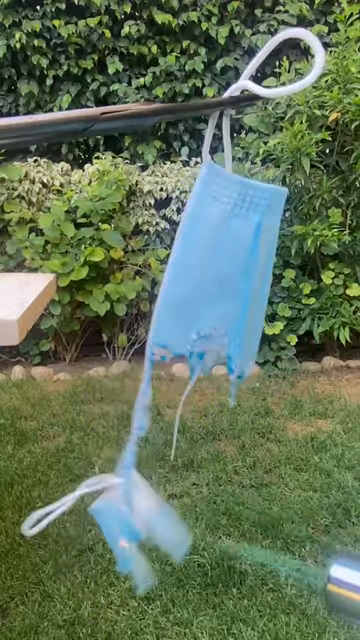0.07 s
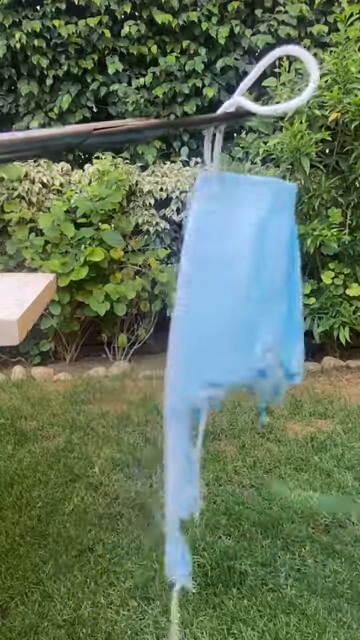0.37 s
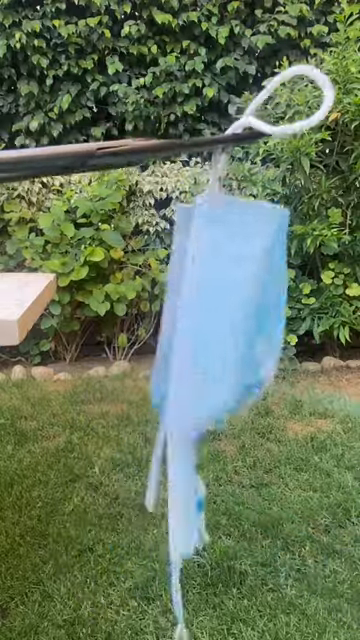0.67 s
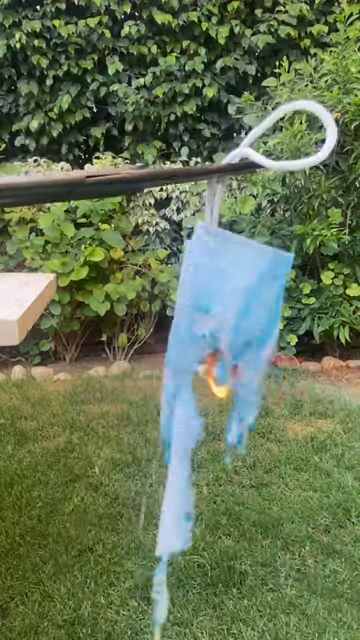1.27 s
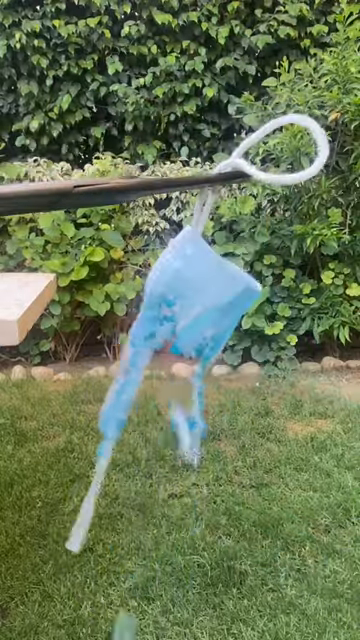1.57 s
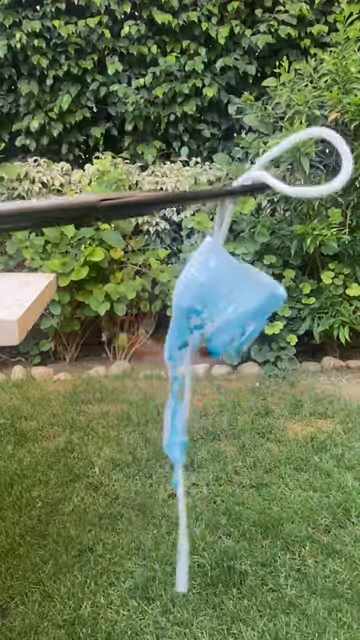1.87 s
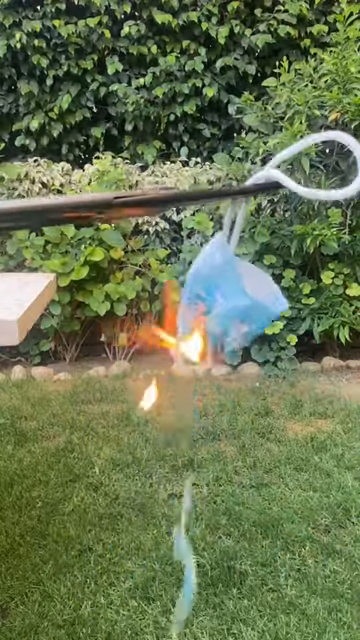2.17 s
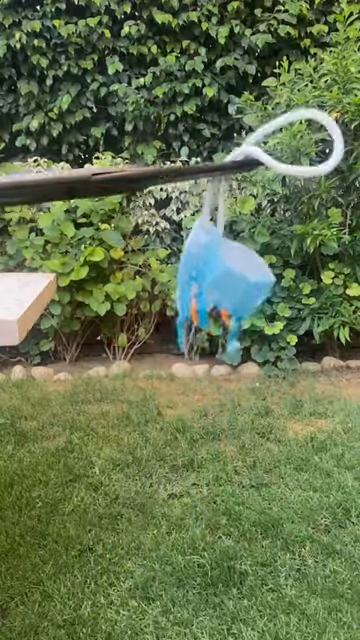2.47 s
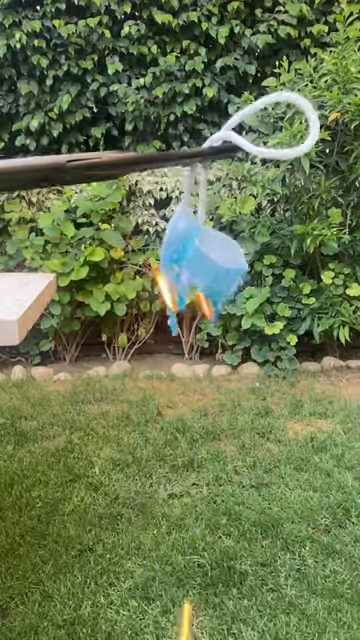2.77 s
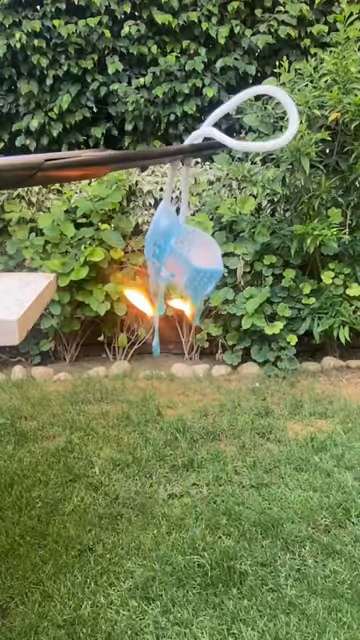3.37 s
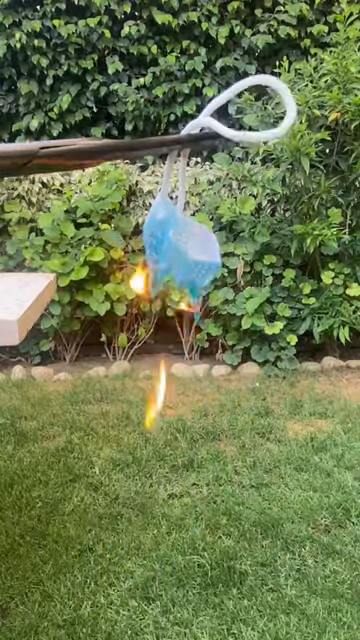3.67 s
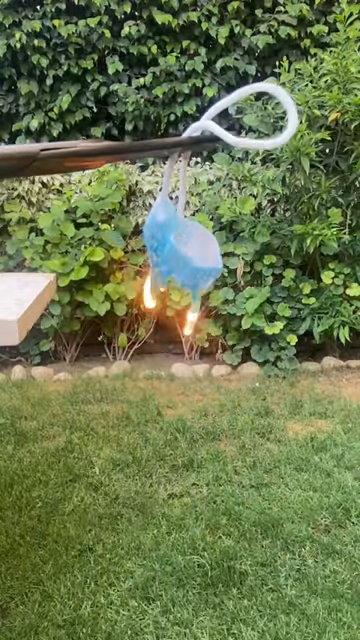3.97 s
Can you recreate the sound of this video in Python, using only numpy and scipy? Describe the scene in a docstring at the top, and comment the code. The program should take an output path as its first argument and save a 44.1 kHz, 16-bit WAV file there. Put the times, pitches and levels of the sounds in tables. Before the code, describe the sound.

A gas torch burns close by with a steady, fluttering roar and a bright, ringing hiss. From about 2.3 seconds, melting plastic sizzles, spits and pops while the hiss swells. The torch cuts off abruptly at about 3.2 seconds, leaving a quiet outdoor rumble. A faint puff and tick come at 3.5 seconds, then a soft low buffet of air and one more spit near 3.9 seconds.

```python
"""A hand-held gas torch burns a hanging piece of plastic in a garden, close to two microphones.
The flame roars, and the gas jet hisses and rings in the burner tube. The hiss swells as the torch is
turned away; then the gas is shut off, and a small puff follows a moment later. The burning plastic
sizzles, spits and pops as bubbles burst and gas escapes. A quiet outdoor rumble lies under it all."""
import sys
import numpy as np
from scipy import signal
from scipy.fft import rfft, irfft
from scipy.io import wavfile

SR = 44100
rng = np.random.default_rng(int(sys.argv[2]) if len(sys.argv) > 2 else 0)


def int16_out(signal):
    """Quantize to a 16-bit WAV file."""
    q = np.round(np.clip(np.atleast_2d(signal).T, -1, 1) * 32767)
    wavfile.write(sys.argv[1], SR, q.astype(np.int16))


N = 176400
T = np.arange(N) / SR
HZ = np.maximum(np.fft.rfftfreq(N, 1 / SR), 1)
TUBE_LIKENESS = 0.96   # how alike the torch's ringing is at the two microphones, 0-1

# the flame in stereo: (frequency [Hz], likeness [0-1], left lead [rad], left over right [dB])
FLAME_STEREO = [(50, .99, -.05, 1.2), (130, .997, -.27, .9), (250, .997, -.37, .7), (550, .99, -.65, -.3),
                (690, .55, -1.7, -3), (790, .9, -.8, -5), (950, .8, -2.2, -4.5), (1100, .45, -4.2, -6),
                (1400, .85, -5.6, -5), (1750, .85, -6.6, -4), (2200, .4, -8, -2)]
# the garden in stereo: same columns
GARDEN_STEREO = [(100, .985, -.12, 1.2), (400, .85, -.2, 0), (1000, .4, -1.4, 0), (3000, .35, -2.8, 0),
                 (6000, .35, -3, 0), (10000, .1, -1.5, 0)]


def from_db(db):
    """Turn decibels into a gain to multiply by."""
    return 10 ** (np.asarray(db) / 20)


def in_time(rows):
    """A gain that follows points of (time [s], level [dB])."""
    return from_db(np.interp(T, *np.transpose(rows)))


def over_hz(rows):
    """Join a table's points into curves over frequency, one for each column after the first."""
    hz, *columns = np.transpose(rows)
    return [np.interp(np.log(HZ), np.log(hz), column) for column in columns]


def flutter(depth_db, rate_hz):
    """A gain that wavers at random."""
    slow = irfft(rfft(rng.standard_normal(N)) / (1 + (HZ / rate_hz) ** 2), N)
    gain = from_db(depth_db * slow / slow.std())
    return gain / np.sqrt(np.mean(gain ** 2))


def fade(start_s, db_per_s):
    """Full level, then a steady fall."""
    return from_db(-db_per_s * np.maximum(T - start_s, 0))


def hump(hz, half_width):
    """The shape of a resonance: a gain that favours frequencies near hz."""
    return 1 / (1 + ((HZ - hz) / half_width) ** 2)


def low_pass(x, edge_hz):
    """Cut the treble steeply."""
    return signal.sosfilt(signal.butter(8, edge_hz, fs=SR, output="sos"), x)


def noise(colour, likeness, lead, pan_db=0):
    """Stereo noise: likeness is the share both sides have in common, lead the left's head start [rad]."""
    shared, left, right = rfft(rng.standard_normal((3, N)))
    common, own = np.sqrt(likeness), np.sqrt(1 - likeness)
    left = (common * shared * np.exp(1j * lead) + own * left) * from_db(pan_db)
    right = common * shared + own * right
    x = irfft(np.array([left, right]) * colour, N)
    return x / np.sqrt(np.mean(x ** 2))


def turbulence(colour, stereo):
    """The noise of swirling air, shaped by a tone colour table and a stereo table."""
    return noise(from_db(over_hz(colour)[0]), *over_hz(stereo))


def flame_roar():
    """Burning gas makes a fluttering roar that dies when the valve closes."""
    # tone of the roar: (frequency [Hz], relative level [dB])
    colour = [(30, -21.5), (60, -23.5), (90, -12.5), (130, -4), (200, 2), (280, -0.5), (360, -6), (480, -7),
              (590, -11), (685, -25), (775, -9), (850, -16.5), (970, -22.5), (1200, -23), (1480, -24),
              (1780, -27.5), (1950, -35.5), (2250, -39), (3000, -86.5)]
    # strength of the flame: (time [s], level [dB])
    strength = [(0, -39.5), (.7, -39.5), (1.4, -39.5), (2.3, -40), (2.7, -41.5), (3.15, -42)]
    roar = turbulence(colour, FLAME_STEREO) * in_time(strength)
    return roar * flutter(depth_db=1.31, rate_hz=38) * fade(start_s=3.185, db_per_s=413.5)


def jet_rush():
    """Gas rushes out of the nozzle with a bright hiss."""
    # tone of the rush: (frequency [Hz], relative level [dB])
    colour = [(2050, -30), (2350, -1.5), (2600, 5.5), (3400, 1), (3800, 0.5), (4200, -1), (4700, 1),
              (5300, 7), (5800, -4), (6100, 2), (6600, -3.5), (7150, -4.5), (7700, -12), (8150, -16.5),
              (8450, -28), (9000, -32), (9600, -53), (12000, -66)]
    # the rush in stereo: (frequency [Hz], likeness [0-1], left lead [rad], left over right [dB])
    stereo = [(2300, .6, 2.6, -1), (3000, .95, 3.05, 0), (3500, .95, 3.1, 0), (3850, .9, 2.9, 0),
              (4050, .5, 1.5, -1), (4200, .55, 0, -2), (4500, .88, -2.7, 0), (5300, .82, -3, -1),
              (6000, .45, -3.1, -2), (6600, .4, -3.4, -4), (6900, .8, -3.14, 0), (7150, .99, -3.14, 0),
              (7400, 1, -3.14, 0)]
    # strength of the rush: (time [s], level [dB])
    strength = [(0, -65), (.28, -63), (.42, -58.5), (1.3, -56.5), (1.7, -59), (2.3, -58), (2.6, -58.5),
                (3.15, -64)]
    return turbulence(colour, stereo) * in_time(strength)


def resonances(rows):
    """Swirling gas rings at several pitches, each sputtering on its own."""
    dull_top = 1 / (1 + (HZ / 6760) ** 16)
    out = 0
    for hz, half_width, db, lead in rows:
        rasp = flutter(depth_db=1.8, rate_hz=80)
        out += from_db(db) * rasp * noise(dull_top * hump(hz, half_width), TUBE_LIKENESS, lead)
    return out


def burner_ring():
    """The burner tube rings; its mouth is heard too at first, while the nozzle is close."""
    # resonances of the tube: (pitch [Hz], half width [Hz], level [dB], left lead [rad])
    tube_tones = [(2721, 52, -60, 0.46), (2970, 31, -68, -1.5), (3100, 45, -71, 3.5),
                  (4180, 45, -77.5, -1.3), (5222, 30, -67, 1), (5596, 34, -69, 1.3)]
    # their strength as the torch moves: (time [s], gain [dB])
    tube_strength = [(0, -8), (.27, -8), (.42, -1.5), (1.2, -1), (1.8, -2), (2.33, -1.5), (2.46, -13.5),
                     (3.15, -18)]
    # resonances of the mouth: (pitch [Hz], half width [Hz], level [dB], left lead [rad])
    mouth_tones = [(2655, 41, -59, 3), (2765, 134, -57, 1.5), (3103, 65, -67, 0.2), (3670, 630, -66.5, -3),
                   (5174, 38, -68.5, 0.6), (6580, 220, -67.5, 3.5)]
    tube = resonances(tube_tones) * in_time(tube_strength)
    return tube + resonances(mouth_tones) * fade(start_s=0.32, db_per_s=113.5)


def sliding_rings():
    """Two resonances slide in pitch and level as the aim of the torch changes."""
    # paths of the lower and the higher resonance: (time [s], pitch [Hz], level [dB])
    low_path = [(0, 3100, -60.5), (.3, 3130, -62.5), (.6, 3230, -65.5), (2.3, 3180, -64),
                (2.5, 3180, -67.5), (2.8, 3163, -66), (3.15, 3130, -73.5)]
    high_path = [(0, 5170, -74), (.3, 5155, -69), (.6, 5110, -68.5), (1.3, 5100, -65.5), (1.9, 4990, -68.5),
                 (2.3, 5060, -61.5), (2.75, 5275, -64), (3.0, 5280, -56), (3.15, 5210, -60)]
    out = 0
    for path, half_width_hz in (low_path, 40), (high_path, 120):
        times, hz, db = np.transpose(path)
        steady = signal.hilbert(noise(hump(hz.mean(), half_width_hz), TUBE_LIKENESS, lead=3.25))
        offset_hz = np.interp(T, times, hz) - hz.mean()
        slide = np.exp(2j * np.pi * np.cumsum(offset_hz) / SR)   # moves the pitch by offset_hz
        out += from_db(np.interp(T, times, db)) * (steady * slide).real
    return out


def tube_whistle():
    """The burner tube gives a very faint, high whistle from its overtones."""
    # whistle tones: (pitch [Hz], half width [Hz], level [dB])
    tones = [(11810, 55, -111), (12200, 60, -112)]
    return sum(from_db(db) * noise(hump(hz, width), TUBE_LIKENESS, lead=0) for hz, width, db in tones)


def garden():
    """Distant rumble and outdoor air, with a faint fluttering in the middle range."""
    # tones of the rumble and the fluttering: (frequency [Hz], relative level [dB])
    rumble_colour = [(25, -29.5), (60, -13.5), (100, 2), (145, 3.5), (200, -4.5), (300, -10), (480, -27.5),
                     (780, -19.5), (980, -40), (1250, -36.5), (1480, -25.5), (1800, -38), (2300, -47.5),
                     (3200, -41), (4000, -45.5), (5400, -42.5), (7500, -65), (11000, -71), (16000, -62)]
    stir_colour = [(250, -21.5), (450, 0), (560, 1), (680, -7.5), (790, 3.5), (1000, -20), (1480, -9),
                   (2200, -31.5), (5000, -52.5)]
    # strength of the rumble: (time [s], level [dB])
    strength = [(3.27, -52), (3.4, -55), (3.5, -53), (3.7, -54.5), (3.85, -53)]
    stir = from_db(-73) * flutter(depth_db=1.7, rate_hz=14) * turbulence(stir_colour, GARDEN_STEREO)
    return in_time(strength) * turbulence(rumble_colour, GARDEN_STEREO) + stir


def turned_hiss():
    """A broad hiss swells as the nozzle is turned away."""
    # tone of the hiss: (frequency [Hz], relative level [dB])
    colour = [(900, -25), (1250, -16.5), (1700, -21), (2030, -18.5), (2320, -29.5), (2560, -2), (2800, 10),
              (2950, -2), (3050, -5.5), (3150, -5), (3400, -26.5), (4200, -33), (4800, -6), (5230, 0),
              (5500, -9), (5730, -5.5), (6200, -23.5), (6800, -35.5), (9000, -68)]
    # the hiss in stereo: (frequency [Hz], likeness [0-1], left lead [rad], left over right [dB])
    stereo = [(1250, .8, 2.8, -2), (2000, .93, 3.1, 0), (2500, .995, 3.12, 0), (3150, 1, 3.14, 0),
              (4800, .82, 3.2, 0), (5300, .83, 3.05, 0), (6200, .8, 3.1, 0)]
    # its swell: (time [s], level [dB])
    swell = [(1.8, -87.5), (2.35, -62), (2.5, -56), (2.75, -55.5), (2.98, -49.5), (3.15, -52.5)]
    return turbulence(colour, stereo) * in_time(swell)


def melt_noise(hz, octaves, lead):
    """Gas leaving the melted plastic: a broad band of noise with a dull top."""
    band = (1 + (np.log2(HZ / hz) / octaves) ** 2) ** -1.5
    dull_top = 1 / np.sqrt(1 + (HZ / 7000) ** 16)
    return noise(band * dull_top, likeness=0.92, lead=lead)


def sizzle():
    """Tiny bubbles of melt burst at random while the flame is on the plastic."""
    start_s, end_s, bursts_per_s, decay_s = 2.25, 3.15, 30, 0.0012
    level_db, spread_db = -59.5, 1.5
    bursts = (rng.random(N) < bursts_per_s / SR) & (T > start_s) & (T < end_s)
    sizes = bursts * from_db(level_db + spread_db * rng.standard_normal(N))
    envelope = signal.lfilter([1], [1, -np.exp(-1 / (decay_s * SR))], sizes + 1e-18)   # each dies away
    return low_pass(envelope * melt_noise(hz=1350, octaves=0.7, lead=3.4), edge_hz=4800)


def spits():
    """Each spit is a short, grainy burst of escaping gas with a faint echo from the hedge."""
    # gas bursts: (time [s], level [dB], hold [s], centre [Hz], width [octaves], left lead [rad])
    bursts = [(2.313, -39.5, 0.0038, 6250, 1, 2.48), (2.314, -42, 0.0019, 1470, 0.92, 3.2),
              (2.358, -46.5, 0.0042, 5200, .4, 2.5), (2.372, -52, 0.0017, 1700, 0.86, 2.3),
              (2.551, -51.5, 0.0068, 5230, 0.29, 1.1), (2.731, -50.5, 0.0035, 1300, .5, 3),
              (2.758, -42, 0.0091, 1490, 0.33, 2.75), (2.758, -44, 0.0038, 5070, 0.3, 2.6),
              (2.783, -45.5, 0.0066, 1370, 0.38, 2.9), (2.937, -56.5, 0.0057, 1190, 0.65, 0.81),
              (2.939, -54, 0.011, 5000, 0.58, 1.5), (2.948, -54, 0.004, 1490, 0.5, .8),
              (3.531, -70, 0.004, 4330, 0.57, 1.5), (3.605, -73, 0.028, 1600, 0.6, 3.9),
              (3.839, -70, 0.0059, 735, 0.88, 1.1), (3.855, -64, 0.018, 560, 1.1, 1),
              (3.906, -64, 0.0098, 620, 0.44, 0.54), (3.9353, -49, 0.018, 5300, 0.34, 1.1),
              (3.939, -61, 0.02, 2770, 1.5, 0.46), (3.952, -64, 0.043, 5100, 0.35, 1.7),
              (3.971, -61, 0.0071, 4000, 0.6, 1.1)]
    attack_s, decay_s, tail_s, tail_db = 0.0009, 0.0012, 0.03, -23
    grain = flutter(depth_db=3.5, rate_hz=270)
    out = 0
    for start, db, hold, hz, octaves, lead in bursts:
        rise = np.clip((T - start) / attack_s, 0, 1)
        after_hold = np.maximum(T - start - hold, 0)
        fall = np.exp(-after_hold / decay_s) + from_db(tail_db) * np.exp(-after_hold / tail_s)
        out += from_db(db) * rise * fall * melt_noise(hz, octaves, lead)
    return low_pass(out * grain, edge_hz=7800)


def pops():
    """A blister bursts in one sharp pulse, followed by faint scatter from the leaves."""
    # bursting blisters: (time [s], peak [dB], low edge [Hz], high edge [Hz], left lead [rad])
    blisters = [(2.3136, -28.5, 3300, 7800, 2.7), (2.3985, -29.5, 3200, 5300, .7),
                (2.76, -39, 1100, 5200, 1.5), (3.5332, -49, 1800, 6200, .7), (3.9495, -40, 2500, 6200, .8)]
    tail_db, tail_s = -31, 0.012
    out = 0
    for start, db, low, high, lead in blisters:
        tail = (T > start) * np.exp(-np.minimum(np.abs(T - start) / tail_s, 20))
        pulse = from_db(tail_db) * tail * rng.standard_normal(N)
        pulse[int(start * SR)] = 1
        band = signal.butter(2, [low, high], "band", fs=SR, output="sos")
        pop = signal.hilbert(low_pass(signal.sosfilt(band, pulse), high))   # lets the left side lead
        out += from_db(db) * np.real([pop * np.exp(1j * lead), pop]) / np.abs(pop).max()
    return out


def far_chirp():
    """One faint chirp sounds far away."""
    # the chirp: (time [s], half length [s], pitch [Hz], half width [Hz], level [dB])
    chirp = (3.345, .04, 3330, 170, -80)
    time, half_length, hz, half_width, db = chirp
    envelope = from_db(db) * np.exp(-((T - time) / half_length) ** 2)
    return envelope * noise(hump(hz, half_width), likeness=1, lead=np.pi / 2)


def soft_puff():
    """One small, soft puff sounds a moment after the flame has gone out."""
    # the puff: (time [s], half length [s], level [dB])
    puff = (3.5, 0.017, -67)
    # its tone: (frequency [Hz], relative level [dB])
    colour = [(300, -20), (750, 10), (1100, 2), (1600, 3), (2300, -17), (3200, -18), (5500, -16),
              (7500, -42), (10000, -59)]
    time, half_length, db = puff
    return from_db(db) * np.exp(-((T - time) / half_length) ** 2) * turbulence(colour, FLAME_STEREO)


def air_buffet():
    """A low buffeting of air rises near the end."""
    # tone of the buffeting: (frequency [Hz], relative level [dB])
    colour = [(18, -22.5), (45, -5.5), (90, -3.5), (160, -17), (400, -32), (1000, -72)]
    # its strength: (time [s], level [dB])
    strength = [(3.5, -73), (3.68, -49.5), (3.85, -59.5), (4, -51.5)]
    return in_time(strength) * turbulence(colour, GARDEN_STEREO)


def scene():
    """Torch, garden and burning plastic; all sounds of the gas jet waver and stop together."""
    roar = flame_roar()
    jet = jet_rush() + burner_ring() + sliding_rings() + tube_whistle() + turned_hiss()
    jet *= flutter(depth_db=1.03, rate_hz=22.7) * fade(start_s=3.158, db_per_s=322)
    return roar + jet + garden() + sizzle() + spits() + pops() + far_chirp() + soft_puff() + air_buffet()


def record(dry):
    """Cut away the very highest treble."""
    cutoff_hz = 16000
    return signal.sosfilt(signal.cheby2(12, 70, cutoff_hz, fs=SR, output="sos"), dry)


dry = scene()
out = record(dry)
int16_out(out)
```